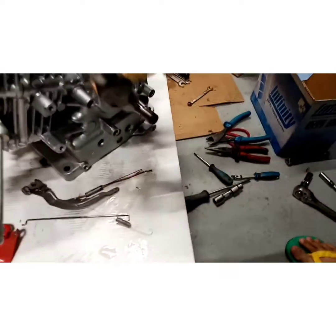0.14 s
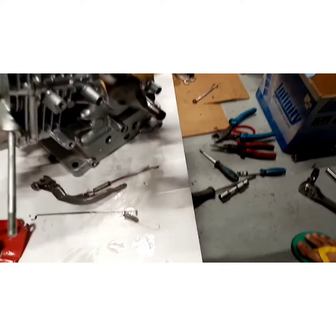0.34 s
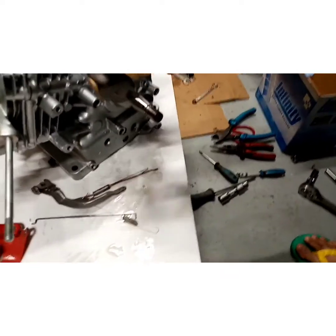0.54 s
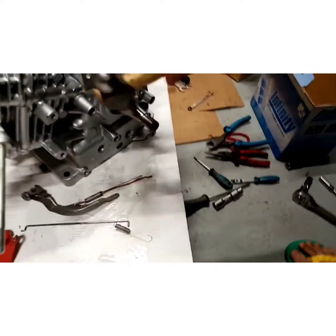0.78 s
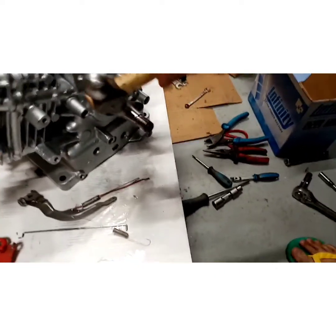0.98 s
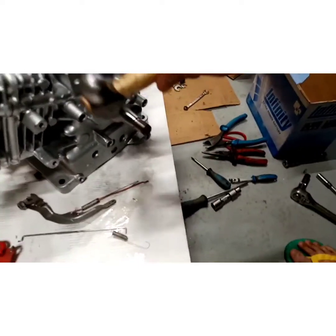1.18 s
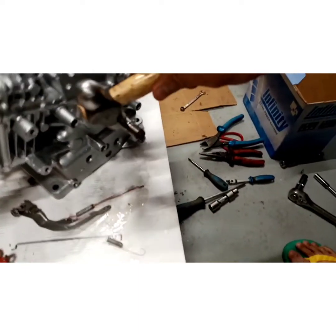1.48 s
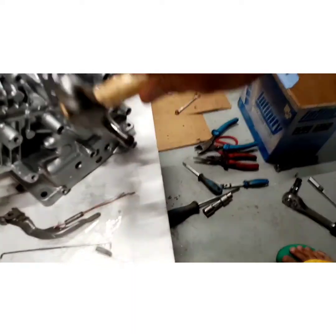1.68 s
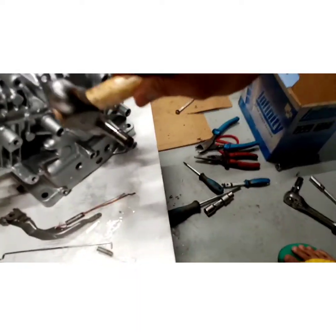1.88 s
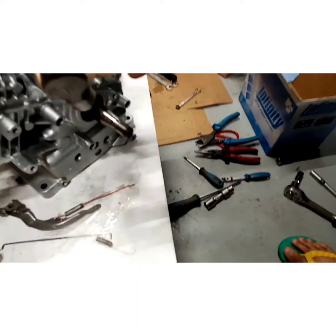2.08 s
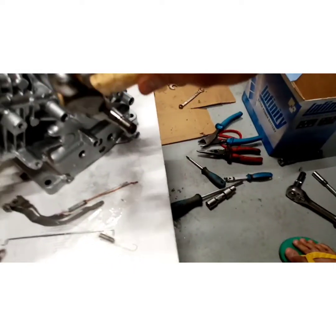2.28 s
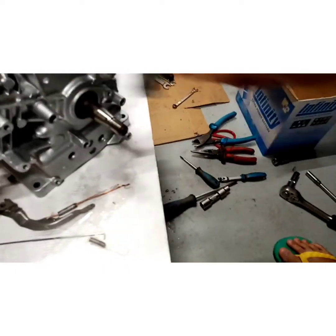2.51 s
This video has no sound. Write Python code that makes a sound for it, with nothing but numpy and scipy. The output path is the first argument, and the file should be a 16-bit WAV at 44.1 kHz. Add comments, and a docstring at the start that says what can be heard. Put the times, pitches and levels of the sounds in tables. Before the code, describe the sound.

Small hammer striking a metal engine case on a workbench: a few softer, glancing double clicks, then louder square clanks about six per second, with short room reflections and faint hum and hiss, heard close in stereo.

```python
"""Hammer taps on an engine case

A small hammer taps a shaft in a cast metal engine case on a workbench in a quiet workshop.
Each tap is swelling, dying tones of the case, bright contact noise, early echoes and a few thin rings;
below lie a low boom of the bench (resonated noise) and a wash from the walls (the tap smeared by fading noise).
The room hums and hisses underneath as shaped noise. Two unlike microphones, the left one early and dull."""
import sys
import numpy as np
from scipy import signal
from scipy.fft import rfft, irfft, next_fast_len
from scipy.io import wavfile
from scipy.ndimage import uniform_filter1d, minimum_filter1d

SR = 44100
rng = np.random.default_rng(int(sys.argv[2]) if len(sys.argv) > 2 else 0)


def amplitude_ratio(level_db):
    """Convert a level in decibels to the matching linear amplitude (field) ratio."""
    exponent = np.asarray(level_db, float) / 20
    return 10 ** exponent


def pcm_store(signal):
    """Save signal as 16-bit PCM."""
    levels = np.round(np.clip(np.atleast_2d(signal), -1, 1) * 32767)
    wavfile.write(sys.argv[1], SR, levels.astype(np.int16).T)


N = 116865

# hammer taps: (time [s], level [dB], spot [0 glancing - 1 square], wash [dB against the tap],
# boom [dB against the tap], time the wash holds before its faster fall [s])
TAPS = [(0.1357, -13.5, 0.38, -16, -19.5, 0.024), (0.29, -18.5, 0.23, -16, -14, 0.053),
        (.437, -14.5, 0.27, -11, -16, 0.041), (.613, -30, 0.15, -12.5, -5, 0.032),
        (0.7576, -11.5, 0.61, -12, -14.5, 0.059), (0.923, -6, 0.73, -11, -22, 0.037),
        (0.951, -11.5, 0.97, -17.5, -23.5, 0.029), (1.0858, -8, 0.94, -11, -19.5, 0.069),
        (1.249, -5.5, 0.63, -14.5, -21.5, 0.068), (1.409, -7, 0.89, -14, -23.5, 0.056),
        (1.55, -10.5, 0.93, -10, -17, 0.048), (1.7109, -9.5, .9, -13.5, -20, 0.049),
        (1.8725, -7, 0.85, -14.5, -23, 0.046), (2.176, -8, 0.91, -14, -26, 0.052),
        (2.3108, -5.5, 0.88, -16, -28, 0.076)]


def at_hz(points, hz, axis=1):
    """Reads one column of a table on a log-frequency axis."""
    points = np.array(points)
    return np.interp(np.log(hz), np.log(points[:, 0]), points[:, axis])


def rms_one(x):
    """Scales to rms 1."""
    return x / np.sqrt(np.mean(x ** 2) + 1e-20)


def bands(shape):
    """Slices of stereo noise 0.4 octave wide, left and right as alike as their pitch asks: (Hz, noise)."""
    # how alike the two microphones hear diffuse sound: (frequency [Hz], left-right correlation [0-1])
    likeness = [(60, 0.71), (300, 0.87), (1000, 0.15), (3000, 0.067), (15000, .1)]
    white = rng.standard_normal((2, 2) + shape)
    edges = 35 * 2 ** np.arange(0, 9.1, 0.4)
    for k, (low, high) in enumerate(zip(edges, edges[1:])):
        band = signal.butter(2, [low, high], "band", fs=SR, output="sos")
        mid, side = signal.sosfilt(band, white[k % 2])  # neighbours use unlike noise
        hz = np.sqrt(low * high)
        alike = at_hz(likeness, hz)
        mid, side = np.sqrt(1 + alike) * mid, np.sqrt(1 - alike) * side
        yield hz, np.array([mid + side, mid - side])


def two_falls(t, rise_s, knee_s, slow_db_s, late_db_s):
    """Rises, sinks slowly to a knee, then faster."""
    rise = np.minimum(t / rise_s, 1) ** 2
    late = np.maximum(t - knee_s, 0)
    return rise * amplitude_ratio(-slow_db_s * t - (late_db_s - slow_db_s) * late)


def room_tone():
    """Steady hum and hiss of the workshop: noise bands that each waver a little."""
    # colour of the room: (frequency [Hz], relative level per Hz [dB])
    colour = [(25, -8), (60, -9), (150, 2), (330, -3), (600, -11.5), (1240, -12), (2000, -18.5),
              (4300, -20.5), (5800, -18.5), (7200, -26), (13500, -43), (15100, -11), (16300, -58)]
    level_db, waver_db, wavers_per_s = -40, 1, 12
    steps = np.arange(N + SR) / SR * wavers_per_s
    out = 0
    for hz, noise in bands((N + SR,)):
        waver = np.interp(steps, np.arange(50), rng.standard_normal(50))
        out = out + amplitude_ratio(at_hz(colour, hz) + waver_db * waver) * noise
    return amplitude_ratio(level_db) * rms_one(out[:, SR:])  # the filters settle in the first second


def boom(t):
    """The bench takes a thud; noise through its low resonances swells and hangs in the room."""
    # bench resonances: (frequency [Hz], width [Hz], level [dB])
    bench = [(135, 90, -18), (149.2, 9.5, 0.05), (185, 58, -3.5), (245, 32, -1), (278, 13.3, -6.5),
             (354.2, 11, 1)]
    push = rng.standard_normal((len(TAPS), len(t)))
    swell = two_falls(t, rise_s=0.024, knee_s=0.054, slow_db_s=23, late_db_s=260)
    thud = 0.9 * amplitude_ratio(-400 * t)
    out = 0
    for hz, width_hz, db in bench:
        r = np.exp(-np.pi * width_hz / SR)
        poles = [1, -2 * r * np.cos(2 * np.pi * hz / SR), r * r]
        out = out + amplitude_ratio(db) * rms_one(signal.lfilter([1, 0, -1], poles, push))
    onset = np.minimum(t / 0.001, 1)
    cut = signal.butter(2, 80, "high", fs=SR, output="sos")
    return signal.sosfilt(cut, onset * (swell + thud) * out / 2)


def wash(t, sound, holds_s):
    """The struck sound smeared by dense wall reflections, noise that fades band by band."""
    # reflections: (frequency [Hz], level [dB], slow fall [dB/s], later fall [dB/s])
    reflections = [(500, 3.5, 86, 272), (830, 1, 120, 282), (1340, 0.75, 122, 286), (2140, 9.5, 126, 315),
                   (3056, 0, 172, 289), (3900, 1, 179, 317), (5700, 4, 153, 313), (9000, 2.3, 187, 312),
                   (15000, -3, 168, 303)]
    walls = 0
    for hz, noise in bands((len(TAPS), len(t))):
        if hz > 300:
            slow, late = at_hz(reflections, hz, axis=2), at_hz(reflections, hz, axis=3)
            fall = two_falls(t, 0.0027, holds_s, slow, late)
            walls = walls + amplitude_ratio(at_hz(reflections, hz)) * fall * noise
    return irfft(rfft(walls) * rfft(sound), len(t)) / np.sqrt(SR / 100)


def echoes(knock):
    """Bench and floor return the knock without its low end, the far wall a dull slap."""
    # near surfaces: (delay [ms], left level [dB], right level [dB])
    near = [(3.1, -15.5, -4), (5.3, -10, -13)]
    scatter_db, near_cut_hz = 1.5, 1460
    far_s, far_db, far_cut_hz = 0.021, -17.5, 970
    out = knock.copy()
    chance = rng.standard_normal((len(TAPS), len(near)))
    thin = signal.sosfilt(signal.butter(1, near_cut_hz, "high", fs=SR, output="sos"), knock + 1e-18)
    for k, (ms, left_db, right_db) in enumerate(near):
        gain = amplitude_ratio(np.array([[left_db], [right_db]]) + scatter_db * chance[:, k])
        out += gain[:, :, None] * np.roll(thin, int(ms * SR / 1000), axis=2)
    dull = signal.sosfilt(signal.butter(2, far_cut_hz, fs=SR, output="sos"), knock + 1e-18)
    return out + amplitude_ratio(far_db) * np.roll(dull, int(far_s * SR), axis=2)


def crack(t, spot):
    """First contact: bright noise, partly unlike in the two microphones; also its colour as a bare click."""
    # colour of the contact: (frequency [Hz], level if glancing [dB], level if square [dB])
    contact = [(500, -14, -14), (1960, -3, -12), (3200, -10, 6), (4800, -15, 6), (6500, -6.5, -6),
               (10500, -3, -13.5), (12100, -15, -24), (15400, 0, -12.5), (16000, -30, -48)]
    u = t / 0.0013  # time in swells
    shared = rng.standard_normal((len(TAPS), len(t)))
    unlike = 0.31 * rng.standard_normal((2, len(TAPS), len(t)))
    burst = (shared + unlike) * u * np.exp(1 - u)
    hz = np.maximum(np.arange(len(t) // 2 + 1) * SR / len(t), 1)
    colour = amplitude_ratio((1 - spot) * at_hz(contact, hz) + spot * at_hz(contact, hz, axis=2))
    strength = np.sqrt(np.mean(np.sum(burst ** 2, axis=2)))
    click = np.roll(irfft(colour, len(t)), 64, axis=1) * strength
    return irfft(rfft(burst) * colour, len(t)), click


def case(t, spot):
    """Case tones swell and die within milliseconds, rings last longer; every tap lands a little differently."""
    # broad knocks of the case: (frequency [Hz], level if glancing [dB], level if square [dB],
    # swell of a glancing blow [ms], left over right [dB])
    knocks = [(690, -10.5, -7.5, 2.02, 7), (944, -4, -9.5, 1.815, 1), (1295, -9.5, -0.5, 1.96, 6),
              (1606, -4.5, -15.5, 2.345, -7), (2332, -15.5, -8, 2.397, 1.7), (2809, -13, -2.5, 2.2, -0.5),
              (3494, -15.5, 6, 2.6, 2.5), (3841, -12.5, 2.5, 1.96, 4), (5110, -33, -6.5, 1.66, .1),
              (6420, -42, -5, 1.5, 5.5)]
    # thin rings of shaft and hammer: (frequency [Hz], level if glancing [dB], level if square [dB],
    # time to fall 60 dB [s])
    rings = [(940, 1, -61, 0.17), (1400, -17, -18, 0.16), (1870, -33, -43, 0.02), (2408, -81, -58, 0.02),
             (3000, -26, -28, 0.21), (3100, -23, -6.5, .07), (3520, -26, -69, 0.023),
             (3230, -2, -53, 0.017), (3570, -11, -38, 0.14), (5370, -80, -55, 0.021)]
    scatter_db, pitch_scatter = 1.5, 0.008  # pitch as a fraction
    square_swell = 0.64  # square blows swell faster
    chance = rng.standard_normal((len(TAPS), 2, len(knocks) + len(rings)))
    short = t[:1500]
    knock, ring = 0, 0
    for k, (hz, glancing_db, square_db, ms, pan_db) in enumerate(knocks):
        swell_s = ms / 1000 * (1 - spot + spot * square_swell)
        u = short / swell_s
        pitch = hz * (1 + pitch_scatter * chance[:, 1, k, None])
        wave = (u * np.exp(1 - u)) ** 2 * np.cos(2 * np.pi * pitch * (short - swell_s))
        gain = amplitude_ratio(glancing_db + (square_db - glancing_db) * spot + scatter_db * chance[:, 0, k, None])
        knock = knock + gain * wave * amplitude_ratio(pan_db * np.array([0.5, -0.5]))[:, None, None]
    for k, (hz, glancing_db, square_db, t60) in enumerate(rings):
        gain = amplitude_ratio(glancing_db + (square_db - glancing_db) * spot + scatter_db * chance[:, 0, -k - 1, None])
        ring = ring + gain * amplitude_ratio(-60 * t / t60) * np.sin(2 * np.pi * hz * t)
    return np.pad(knock, [(0, 0), (0, 0), (0, len(t) - len(short))]), ring


def taps():
    """Lays every tap with its echoes, wash and boom at its time; a rebound repeats the knock of its tap."""
    # rebounds of the hammer head: (time [s], level against its tap [dB])
    rebounds = [(.142, -7.5), (.149, -16), (0.295, -0.5), (.444, -2), (0.45, -15), (.619, 6), (.626, -13),
                (0.773, -2.5), (.781, -6), (1.112, -7), (1.295, -11.5), (1.572, -8.5), (1.895, -19),
                (2.342, -17)]
    size, ring_in_wash, rebound_crack = 16384, 0.1, 0.38  # samples; shares of ring and of crack
    s, db, spot, wash_db, boom_db, holds_s = np.transpose(TAPS)[:, :, None]
    t = np.arange(size) / SR
    knock, ring = case(t, spot)
    burst, click = crack(t, spot)
    body = amplitude_ratio(db) * (echoes(knock) + ring)
    burst = amplitude_ratio(db) * echoes(burst)
    walls = amplitude_ratio(db + wash_db) * wash(t, knock + click + ring_in_wash * ring, holds_s)
    each = body + burst + walls + amplitude_ratio(db + boom_db) * boom(t)
    again = body + rebound_crack * burst
    out = np.zeros((2, N + size))
    for k, start in enumerate((s[:, 0] * SR).astype(int)):
        out[:, start:start + size] += each[:, k]
    for again_s, again_db in rebounds:
        start = int(again_s * SR)
        last_tap = np.searchsorted(s[:, 0], again_s) - 1
        out[:, start:start + size] += amplitude_ratio(again_db) * again[:, last_tap]
    return out[:, :N]


def scene():
    """Taps over the room tone."""
    return taps() + room_tone()


def gain_control(x):
    """Looks ahead, turns loud moments down by a share of their excess, lets go at a steady rate."""
    from_db, share, let_go_db_s = -30, 0.24, 892
    look_ahead_s, grip_s = 0.014, 0.004
    level_db = 10 * np.log10(uniform_filter1d(np.mean(x ** 2, axis=0), size=88) + 1e-9)
    ahead = int(look_ahead_s * SR)
    ramp = let_go_db_s * np.arange(N) / SR
    held = np.maximum.accumulate(level_db + ramp) - ramp
    padded = np.pad(held, (0, ahead), "edge")
    held = -minimum_filter1d(-padded, size=ahead + 1, origin=-(ahead // 2))[:N]  # loudest just ahead
    r = np.exp(-1 / (grip_s * SR))
    gain_db = signal.lfilter([1 - r], [1, -r], -share * np.maximum(held - from_db, 0))
    return x * amplitude_ratio(gain_db)


def low_pass(x):
    """Removes everything above the highest recorded frequency."""
    return signal.sosfilt(signal.butter(12, 16790, fs=SR, output="sos"), x)


def record(dry):
    """Two microphones without deep bass, the left duller and a millisecond ahead; then gain control."""
    # colour of the left microphone: (frequency [Hz], level [dB])
    left_colour = [(60, -1.5), (380, -4.5), (700, -3), (1290, -2), (2380, -0.7), (4400, -3.5),
                   (8120, -17.5), (15000, -25)]
    lead = 44  # samples
    dry = signal.sosfilt(signal.butter(2, 20.4, "high", fs=SR, output="sos"), dry)
    size = next_fast_len(N + 4096)
    hz = np.maximum(np.arange(size // 2 + 1) * SR / size, 1)
    left = irfft(rfft(dry[0], size) * amplitude_ratio(at_hz(left_colour, hz)), size)[:N]
    right = np.concatenate([dry[1, lead - 1::-1], dry[1, :-lead]])  # the gap holds a mirrored start
    mix = gain_control(np.array([left, right]))
    return low_pass(mix)


dry = scene()
out = record(dry)
pcm_store(out)
```